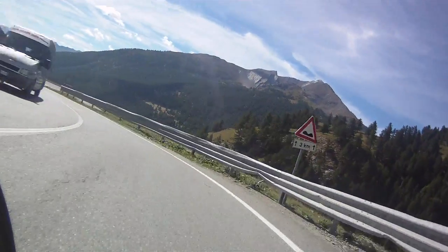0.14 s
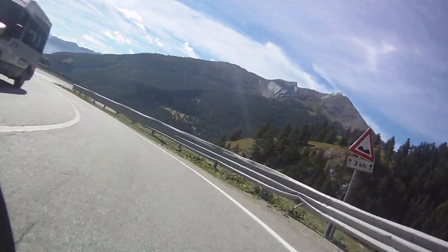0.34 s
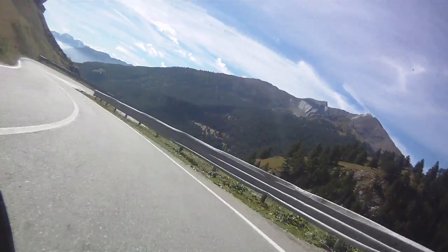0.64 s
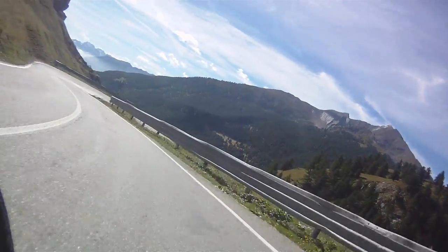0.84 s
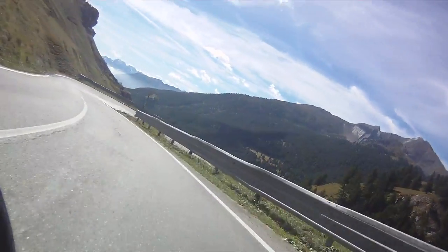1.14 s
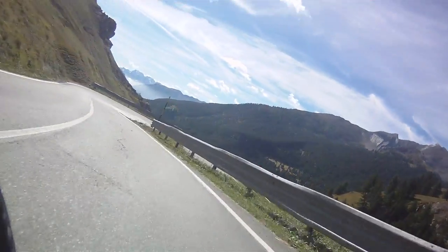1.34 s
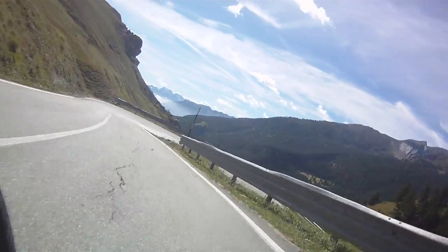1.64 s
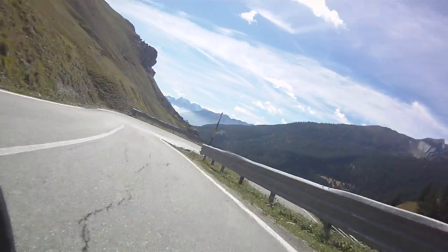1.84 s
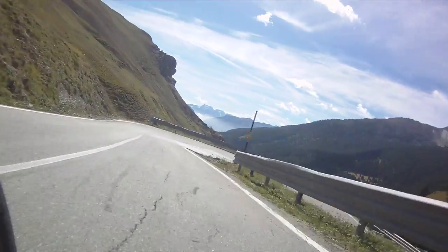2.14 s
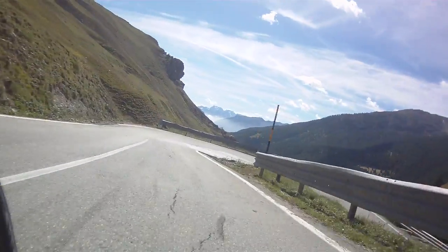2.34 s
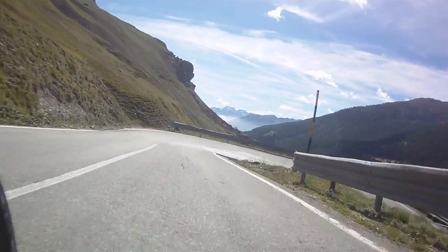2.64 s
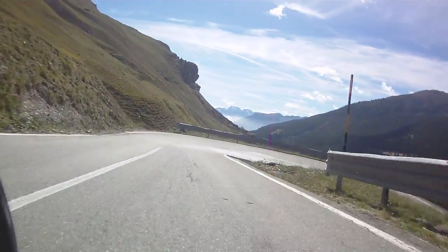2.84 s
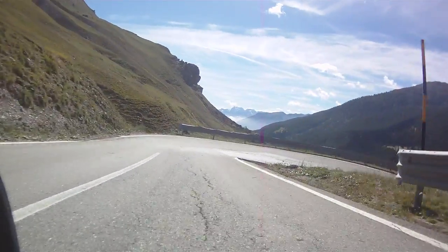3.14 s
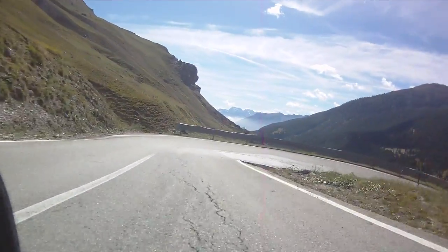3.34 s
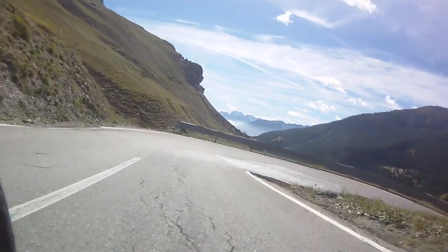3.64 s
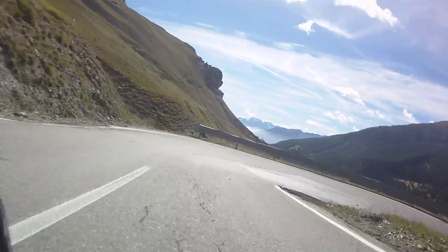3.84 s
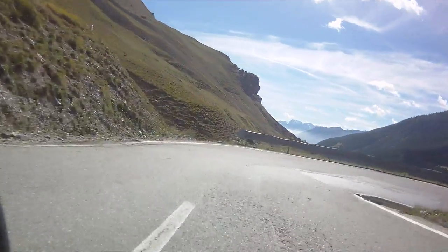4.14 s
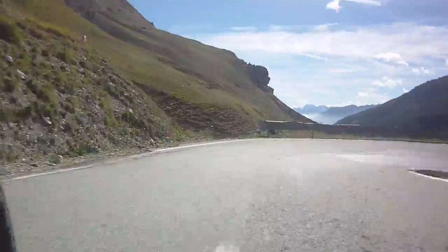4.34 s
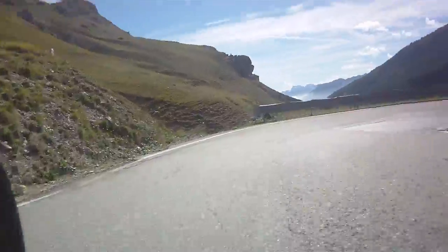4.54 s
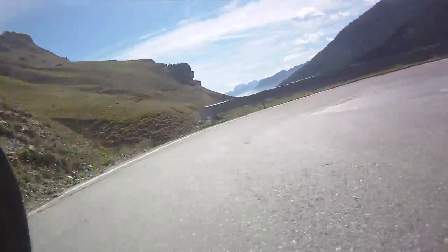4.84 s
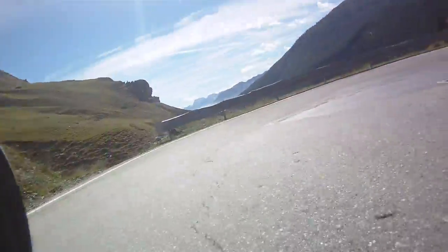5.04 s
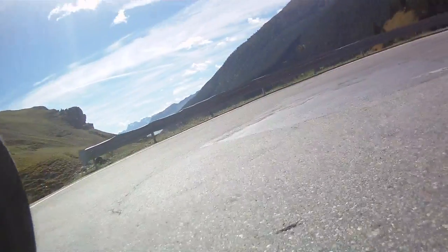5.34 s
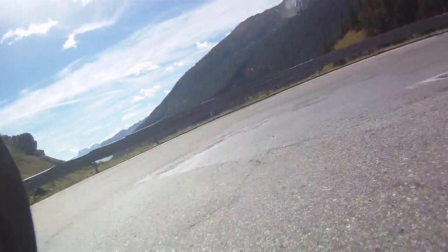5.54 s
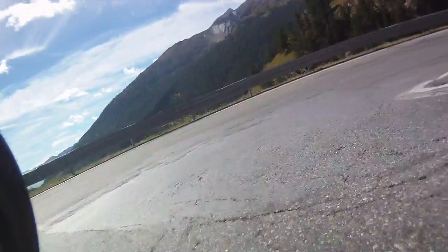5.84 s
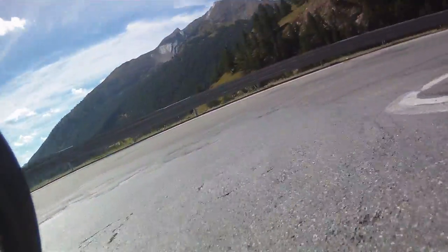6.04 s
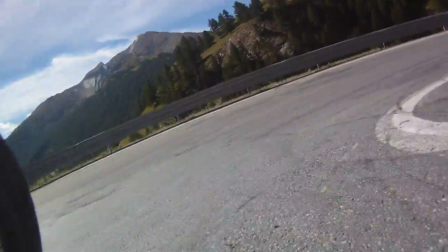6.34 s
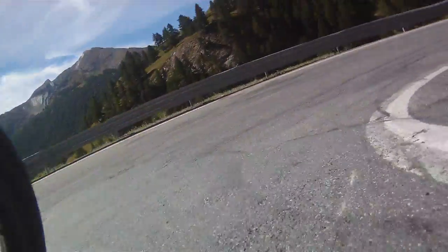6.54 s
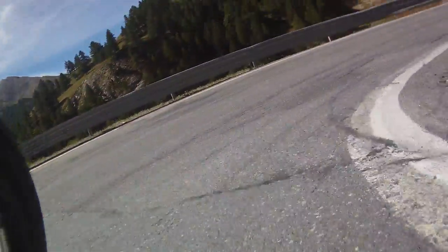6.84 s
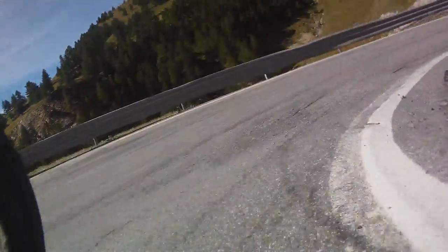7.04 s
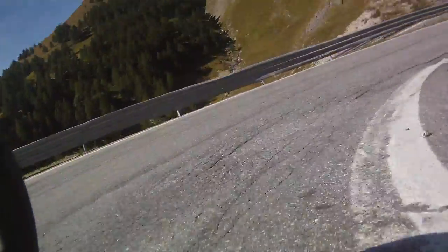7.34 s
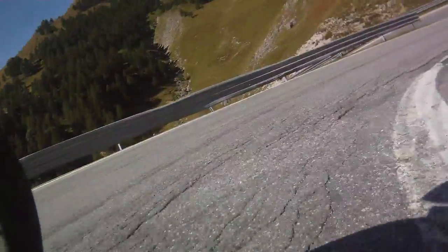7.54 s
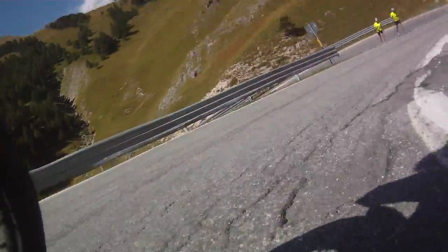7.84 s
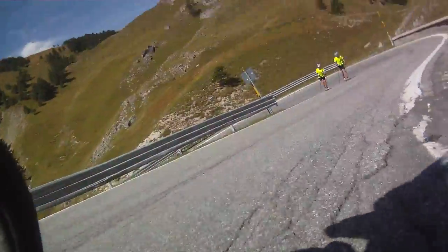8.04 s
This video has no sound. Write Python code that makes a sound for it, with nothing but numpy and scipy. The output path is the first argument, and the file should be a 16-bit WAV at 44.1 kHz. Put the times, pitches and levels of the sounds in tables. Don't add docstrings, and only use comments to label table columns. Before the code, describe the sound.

A twin-cylinder motorcycle throbs steadily, picked up by a small hard-cased camera fixed to the bike. A van drones by with a hiss of tyres, then a quick throttle blip and clacking downshift. The engine pulls, then slows and sinks to a lumpy low beat through a mountain hairpin, with small bumps, before power returns.

```python
import sys
import numpy as np
from scipy import signal
from scipy.fft import rfft, irfft, next_fast_len
from scipy.io import wavfile
from scipy.ndimage import uniform_filter1d

SR = 44100
rng = np.random.default_rng(int(sys.argv[2]) if len(sys.argv) > 2 else 0)


def transcribe(signal):
    frames = np.atleast_2d(signal).T
    limited = np.clip(frames, -1, 1)
    pcm = np.round(limited * 32767).astype(np.int16)
    wavfile.write(sys.argv[1], SR, pcm)


def invert_db(x):
    u = np.asarray(x, float) / 20
    return 10 ** u


N = 361619
T = np.arange(N) / SR


def evened(x, span_s=None):
    if span_s is None:
        power = np.mean(x ** 2)
    else:
        power = abs(uniform_filter1d(x ** 2, int(span_s * SR)))
    return x / np.sqrt(power + 1e-14)


def curves(rows):
    s, *columns = np.transpose(rows)
    return [np.interp(T, s, c) for c in columns]


def lumps(rows, lift):
    return sum(lift(db) * np.exp(-((T - s) / length) ** 2) for s, db, length in rows)


def noise(points):
    f, level = np.transpose(points)
    size = next_fast_len(N)
    hz = np.fft.rfftfreq(size, 1 / SR)
    shape = invert_db(np.interp(np.log(hz + .1), np.log(f + .1), level, right=-200))
    return evened(irfft(rfft(rng.standard_normal(size)) * shape, size)[:N])


def modes(x, table):
    out = np.zeros(N)
    for k, (hz, width, db) in enumerate(table):
        r = np.exp(-np.pi * width / SR)
        ring = signal.lfilter([1 - r], [1, -r * np.exp(2j * np.pi * hz / SR)], x)
        out += (-1) ** k * invert_db(db) * 2 * ring.imag
    return out


# f/Hz, level/dB per Hz
HISS_COLOUR = [(1500, -27), (2500, -6), (4300, -1.5), (9000, -3), (15000, -2), (15250, -3), (15500, -65)]
# f/Hz, level/dB
CIRCUIT_TONES = [(7852, -96), (7882, -92)]


def preamp():
    out = invert_db(-65.5) * noise(HISS_COLOUR)
    for hz, db in CIRCUIT_TONES:
        out += np.sqrt(2) * invert_db(db) * np.sin(2 * np.pi * hz * T)
    return out


# t/s, wind pressure/dB, length/s
GUST_SWELLS = [(.04, -17, .08), (.55, -19, .06), (.78, -17, .12), (1.3, -25, .1), (1.48, -22, .07),
               (1.75, -8, .06), (1.95, -14, .12), (2.4, -23, .07), (2.8, -15, .12), (3.11, -21, .07),
               (3.42, -18, .09), (3.61, -21, .06), (4.0, -22, .05), (4.27, -20, .2), (4.63, -22, .08),
               (4.95, -24, .07), (6.1, -28, .12), (6.55, -27, .1), (6.87, -26, .1), (7.3, -27, .07),
               (7.42, -27, .04), (7.6, -28, .1), (8.08, -22, .15)]


def wind():
    load, vibration = curves(ENGINE_RIDE)[1:]
    calm = invert_db(-28 + 1.1 * vibration)
    pressure = calm + lumps(GUST_SWELLS, invert_db)
    pumping = noise([(1, -20), (3.5, 0), (12, -4), (20, -12), (35, -35)])
    out = invert_db(-4) * pressure * evened(pumping, .35)
    rumble_lag_s = 0.28
    swell = (uniform_filter1d(pressure, int(rumble_lag_s * SR)) / calm) ** 0.57
    rumble = invert_db(-26.5 - 9.5 + 0.73 * vibration - .5 * load)
    colour = [(15, -6), (28, -6), (60, -6), (110, -11), (170, -20.5), (260, -23.5), (400, -35)]
    return out + rumble * swell * noise(colour)


# t/s, level/dB, f/Hz, decay/s
MOUNT_JOLTS = [
    (1.68, -2.5, 5.25, 0.18),
    (1.873, -14, 6.2, 0.99),
    (2.641, -15, 4.87, 0.53),
    (4.05, -19, 3.06, 0.98),
]


def jolts():
    out = np.zeros(N)
    for s, db, hz, decay in MOUNT_JOLTS:
        since = np.maximum(T - s, 0)
        out -= invert_db(db - 20 * since / decay) * np.sin(2 * np.pi * hz * since)
    return out


# t/s, engine pitch f/Hz, engine level/dB, tyre hiss level/dB, hiss centre f/Hz
VAN_PASS = [
    (0, 79.2, -54.5, -82, 2200),
    (.35, 76.85, -61, -62, 2310),
    (.55, 76.9, -31, -61.5, 2400),
    (.72, 73.88, -31.5, -55, 2660),
    (.85, 68.5, -24, -62, 2826),
    (1.05, 70.8, -38, -74, 2790),
    (1.2, 68, -54, -75, 2730),
]


def van():
    hz, drone_db, hiss_db, centre_hz = curves(VAN_PASS)
    gone_s = VAN_PASS[-1][0]
    turn = 2 * np.pi * np.cumsum(hz) / SR
    fade = np.clip((gone_s - T) / 0.32, 0, 1)
    drone = invert_db(drone_db) * np.sin(turn)
    drone += invert_db(-40) * fade * np.sin(2 * turn)
    hiss = noise([(50, -4), (300, -3), (700, -12), (1600, -23)])
    hiss *= np.cos(2 * np.pi * np.cumsum(centre_hz) / SR)
    return np.sqrt(2) * (drone + invert_db(hiss_db) * hiss) * (T < gone_s)


# t/s, level/dB, length/s
CHAIN_SLAPS = [
    (1.27, -60, 0.04),
    (1.71, -53.5, 0.014),
    (1.768, -52, 0.013),
    (7.813, -62, 0.0043),
    (7.973, -58, 0.0061),
    (8.001, -56, 0.008),
    (8.025, -61, 0.0082),
    (8.17, -65, 0.015),
]
# t/s, level/dB, f/Hz, length/s
STONE_PING = (7.815, -60, 4500, .005)


def knocks():
    s, db, hz, length = STONE_PING
    ping = invert_db(db) * np.exp(-((T - s) / length) ** 2) * np.sin(2 * np.pi * hz * T)
    slap = noise([(800, -20), (1500, 4), (3000, 3), (5000, -4), (7000, -30)])
    return ping + lumps(CHAIN_SLAPS, invert_db) * slap


# t/s, crank speed f/Hz, exhaust load level/dB, chassis vibration level/dB
ENGINE_RIDE = [(0, 43.82, -4.5, 3), (.2, 44.46, -5.5, 0.5), (.8, 43.6, -5, 1), (.95, 43.33, -7.5, 3.5),
               (1.23, 44.5, -9, 1.5), (1.57, 42.98, -9.5, 0.5), (2.1, 51.63, 1, 3), (2.69, 47.7, 1, 2),
               (3.9, 41.93, 3, -2.5), (4.02, 40.9, -1, -3.5), (4.36, 37.7, -2, -3),
               (4.98, 32.63, -12.5, -2), (5.18, 33.48, -10, -3), (5.4, 31, -10, -4.5),
               (6.46, 25.78, -13.5, -7), (7.22, 27.51, -9.5, -7.5), (7.8, 26.57, -10, -9.5),
               (8.2, 30.4, -1, 1)]
# t/s, extra crank speed f/Hz, extra load level/dB
THROTTLE_BLIP = [
    (1.57, 0, 0),
    (1.67, 12, 13),
    (1.71, 18.5, 16.5),
    (1.74, 21.5, 4),
    (1.78, 20, -1),
    (1.83, 15, 4),
    (1.97, -1.14, -2.5),
    (2.1, 0, -4),
]
# t/s, level/dB, length/s
CHASSIS_BUMPS = [(.8, 4.5, 0.094), (1.3, -0.5, 0.028), (1.79, 5.5, 0.053), (4.04, 5, 0.032), (4.19, 2.5, .06),
                 (6.62, 1, 0.034), (6.83, 3.5, 0.051), (7.59, 4, 0.039), (7.99, 11.5, 0.026)]


def controls():
    hz, load, vibration = curves(ENGINE_RIDE)
    extra_hz, extra_db = curves(THROTTLE_BLIP)
    return hz + extra_hz, load + extra_db, vibration + lumps(CHASSIS_BUMPS, float)


# level/dB, share of load, share of vibration, lumpiness at low revs/dB
PART_LEVELS = [
    (-26.5, 0.27, 0.21, 1.5),
    (-18.5, 0.98, 0.038, 0.51),
    (-32.5, 0.87, .3, 1.72),
    (-45, 0.12, 0.84, 0.17),
    (-44.5, 0.37, 0.62, 0.36),
]


def part_gains(hz, load, vibration):
    levels = []
    for db, load_share, vibration_share, lumpy_db in PART_LEVELS:
        lumpy = lumpy_db * (45 / hz) ** 2 * noise([(1, -11), (5, -8), (15, -4.5)])
        levels.append(db + load_share * load + vibration_share * vibration + lumpy)
    return invert_db(uniform_filter1d(levels, size=2000))


def blasts(turns, hz):
    uneven, lag_s = 0.0077, 0.00037
    scatter, slip_s = .09, .00013
    at = np.flatnonzero(np.diff(np.floor(turns)))
    chance = rng.standard_normal((1000, 2))[:len(at)] * (45 / hz[at, None]) ** 2
    side = (-1) ** np.arange(len(at))
    late = np.round(SR * (lag_s * side + slip_s * chance[:, 1])).astype(int)
    out = np.zeros(N)
    out[np.clip(at + late, 0, N - 1)] = 1 + uneven * side + scatter * chance[:, 0]
    return signal.oaconvolve(out, signal.windows.hann(41))[:N]


def pipe(x, table, edge_hz):
    cut = signal.butter(2, edge_hz, "high", fs=SR, output="sos")
    return evened(signal.sosfilt(cut, modes(x, table)), .15)


# multiple of crank speed, level/dB over bark
FRAME_ORDERS = [(2, 13), (2.5, -5), (3, -6), (4, -12), (4.5, -7), (5, -2), (6, -2), (7, -7), (8, -10),
                (9, -10), (14, -17), (16, -18)]
# f/Hz, level/dB
FRAME_RESPONSE = [(105, -13), (122, -5), (140, -5), (152, 5), (180, -3), (215, 1), (300, 1), (350, -8),
                  (455, 5), (520, -2)]


def frame(turns, hz):
    out = np.zeros(N)
    for k, db in FRAME_ORDERS:
        wander_db = 2 * noise([(.5, 0), (4, -6), (12, -30)])
        carried_db = np.interp(k * hz, *np.transpose(FRAME_RESPONSE))
        cycle = k * turns - .4
        out += invert_db(db + carried_db + wander_db) * np.cos(2 * np.pi * cycle)
    return out


# f/Hz, level/dB per Hz
ROAR_COLOUR = [(12, -20), (22, -12), (60, -16), (130, -19), (250, -21), (350, -23), (460, -21), (700, -29),
               (950, -38), (1200, -44), (1600, -70)]


def engine_roar(throb, flutter):
    return evened(noise(ROAR_COLOUR) * (1 + 0.11 * throb)) * flutter


# teeth meshing per turn, level/dB over rattle
GEAR_MESH = [(24, -25.5), (26, -20.5), (27, -34), (29, -24), (30, -26), (33, -17), (42, -7)]


def gear_whine(turns, hz):
    whine = np.zeros(N)
    for k, db in GEAR_MESH:
        casing = 1 + (k * hz / 1750) ** 20
        whine += invert_db(db) * np.sin(2 * np.pi * np.round(k) * turns) / casing
    return whine * (hz / 42) ** 2.5 * invert_db(1.2 * noise([(.5, -6), (5, 1), (20, -37)]))


# f/Hz, width/Hz, level/dB
HOUSING_MODES = [(740, 40, 3), (1268, 150, 5), (1473, 137, 2), (1642, 82, -2), (1973, 383, -6),
                 (2200, 330, -6.5), (2730, 320, -15), (3122, 140, -10.5)]
# f/Hz, width/Hz, level/dB
LID_MODES = [(3797, 290, -15.5), (4154, 150, -12.5), (4970, 280, -18), (5480, 340, -22), (6260, 73, -21)]


def housing_rattle(throb, flutter, whine, hz):
    drive = rng.standard_normal(N) * (1 + 0.6 * throb) * flutter
    shell = modes(drive + .75 * whine, HOUSING_MODES)
    shell += (np.minimum(hz, 45) / 41) ** 2 * modes(drive, LID_MODES)
    return evened(shell)


# f/Hz, width/Hz, level/dB
BOOM_MODES = [(87.3, 23, 0), (108.6, 12.3, -9.5)]
# f/Hz, width/Hz, level/dB
BARK_MODES = [(166, 170, -18.5), (248.5, 47, -1.5), (295.5, 7.2, 9.5), (454, 25, -2.5)]


def motorcycle():
    hz, load, vibration = controls()
    shake, boom, bark, roar, rattle = part_gains(hz, load, vibration)
    jitter = .002 * noise([(1, 0), (8, -6), (30, -40)])
    turns = np.cumsum(hz * (1 + jitter)) / SR
    fired = blasts(turns, hz)
    mount = np.minimum(52 / hz, 1) ** 4
    out = invert_db(4.5) * shake * mount * np.cos(2 * np.pi * (turns - .1))
    out += invert_db(-2) * boom * mount ** 1.3 * pipe(fired, BOOM_MODES, 33.5)
    out += invert_db(-3) * bark * (.2 * pipe(fired, BARK_MODES, 130) + frame(turns, hz))
    throb = np.exp(0.39 * (np.cos(2 * np.pi * turns) - 1))
    flutter = invert_db(0.91 * noise([(2, 26), (40, -5.5), (150, -41)]))
    out += invert_db(8) * roar * engine_roar(throb, flutter)
    whine = gear_whine(turns, hz)
    return out + invert_db(-3.5) * rattle * housing_rattle(throb, flutter, whine, hz)


def scene():
    return (wind() + jolts() + van() + knocks() + motorcycle())[None]


# t/s, peak level/dB
OVERLOAD_TICKS = [
    (1.7115, -35),
    (1.7228, -40),
    (1.7658, -34),
    (1.7825, -45),
]


def overload():
    out = np.zeros(N)
    for s, db in OVERLOAD_TICKS:
        out[round(s * SR)] += invert_db(db + 3)
    return out


def band_limit(x):
    return signal.sosfilt(signal.butter(12, 15700, fs=SR, output="sos"), x)


def record(dry):
    out = dry[0] + preamp() + overload()
    out *= signal.windows.tukey(N, .002)
    return band_limit(out[None])


dry = scene()
out = record(dry)
transcribe(out)
```